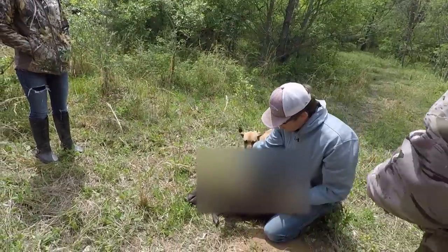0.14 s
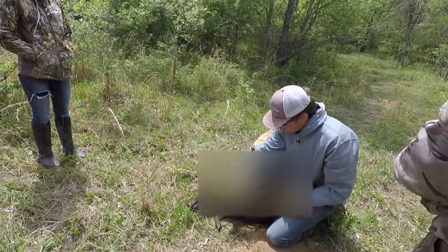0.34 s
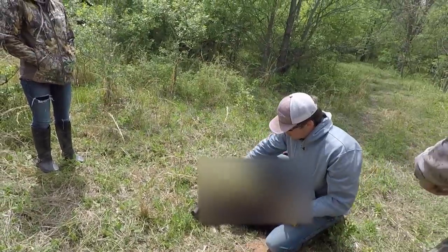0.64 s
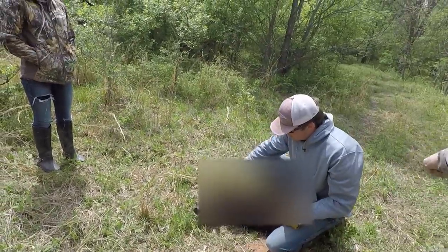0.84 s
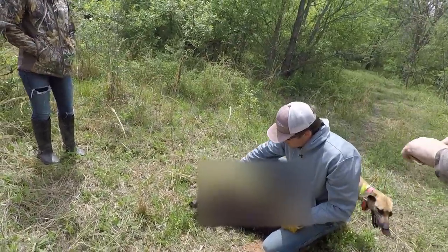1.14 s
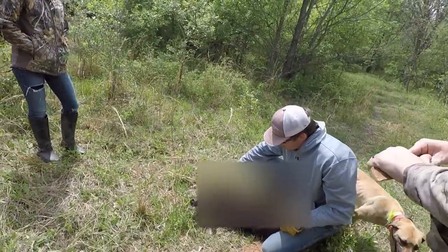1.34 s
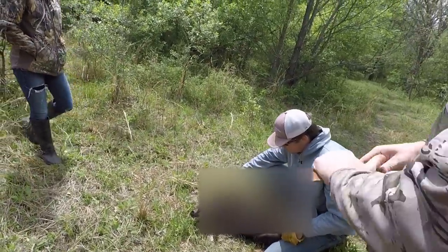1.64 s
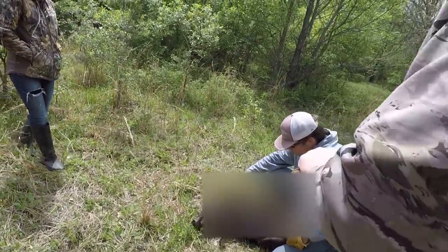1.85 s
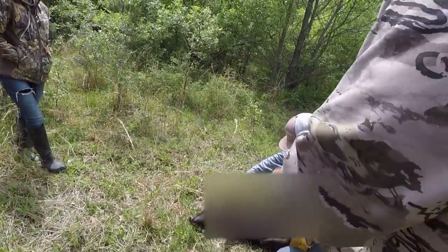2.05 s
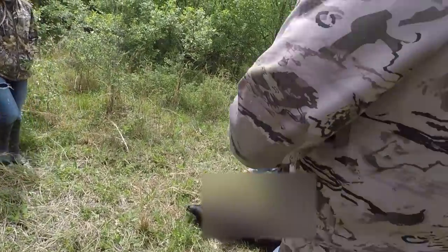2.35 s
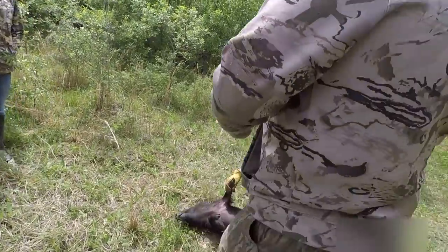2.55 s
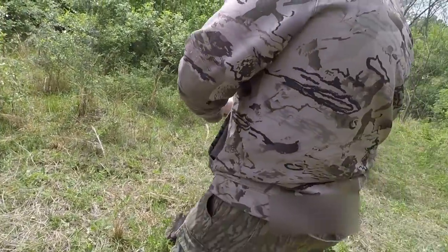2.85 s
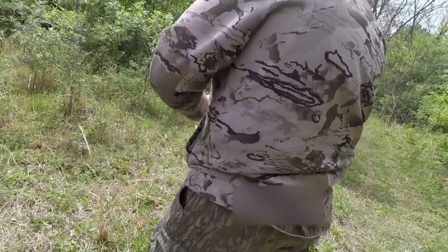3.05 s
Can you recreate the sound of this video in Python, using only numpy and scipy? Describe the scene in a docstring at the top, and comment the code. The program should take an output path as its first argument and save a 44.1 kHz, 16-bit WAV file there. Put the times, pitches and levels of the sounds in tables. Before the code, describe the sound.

Long piercing pig squeal, rough and nearly steady, stops abruptly; later a pulsing growl breaks into a short hoarse shriek and raspy breath, then a brief growl. Outdoor microphone nearby, with dull handling bumps and cloth rustle.

```python
"""Wild pig squealing in the grass

A wild pig pinned in the grass gives one long shrill squeal, then a short hoarse one, with growls around them.
Squeal: the vocal folds chop a high throat whistle into sidebands, mixed with turbulence puffs.
Growl: single fold slaps ring the chest and crack through the mouth; a fluttering noise rasp follows.
Ground, brush and trees return a faint noise tail. Filtered noise makes the jacket's rustle and snaps.
Damped low tones and noise taps make the pig's low opening grunt, then dull bumps by the microphone.
Low lumpy noise is the outdoor rumble, swelling with the pig's growl to carry its continuous low part."""
import sys
import numpy as np
from scipy import signal
from scipy.fft import rfft, irfft
from scipy.io import wavfile
from scipy.ndimage import uniform_filter1d

SR = 44100
rng = np.random.default_rng(int(sys.argv[2]) if len(sys.argv) > 2 else 0)


def master_out(mix):
    """Clip the mix to full scale and print it as 16-bit PCM to the path in sys.argv[1]."""
    frames = np.transpose(np.atleast_2d(mix))
    ceiling = np.clip(frames, -1, 1)
    pcm = np.round(ceiling * 32767).astype(np.int16)
    wavfile.write(sys.argv[1], SR, pcm)


N = 141120


def amp(db):
    """Decibels to gain."""
    return 10 ** (np.asarray(db) / 20)


def unit(x):
    """Scale to rms 1."""
    return x / np.sqrt(np.mean(x ** 2) + 1e-20)


def along(table, t_s, axis=1):
    """Column of a time curve, linear in t."""
    rows = np.array(table, float)
    return np.interp(t_s, rows[:, 0], rows[:, axis])


def across(table, hz, axis=1):
    """Column of a spectrum, linear in log f."""
    rows = np.array(table, float)
    return np.interp(np.log(hz + 1), np.log(rows[:, 0]), rows[:, axis])


def colour(x, spectrum):
    """Zero-phase filter by a spectrum, to rms 1."""
    hz = np.fft.rfftfreq(len(x), 1 / SR)
    return unit(irfft(rfft(x) * amp(across(spectrum, hz)), len(x)))


def noise():
    """White noise for the whole scene."""
    return rng.standard_normal(N)


def wander(size, hz):
    """Low-passed random drift, rms 1 over the whole scene."""
    f = np.fft.rfftfreq(N, 1 / SR)
    return unit(irfft(rfft(noise()) / (1 + (f / hz) ** 2), N))[:size]


def add(mix, s, sound):
    """Mix a sound in at s seconds."""
    part = mix[max(round(s * SR), 0):][:len(sound)]
    part += sound[:len(part)]


def burst(spectrum, decay_s, ring_s=.01, ring_db=-60):
    """Decaying noise push plus weaker ring through a minimum-phase body filter."""
    t = np.arange(4096) / SR
    envelope = np.exp(-t / decay_s) + amp(ring_db) * np.exp(-t / ring_s)
    push = rng.standard_normal(len(t)) * envelope
    log_gain = np.log(amp(across(spectrum, abs(np.fft.fftfreq(len(t), 1 / SR)))))
    body = np.exp(np.conj(signal.hilbert(log_gain)))
    out = np.fft.ifft(np.fft.fft(push) * body).real
    return unit(out) * np.sqrt(2 * decay_s / t[-1])


def spread(source, side_db):
    """Two draws of a source as middle and side."""
    return source() + amp(side_db) * np.array([[1], [-1]]) * source()


# low rumble spectrum, outdoors and growl [f/Hz, gain/dB]
RUMBLE_SPECTRUM = [(25,-16),(60,-58),(105,-31),(155,4),(300,-4),(600,-13),(2000,-13.5),(6500,-26.5),(9000,-66)]
# low rumble level, swelling with the pig's growl [t/s, level/dB]
RUMBLE_LEVEL = [(0,-48),(.6,-48.5),(1.7,-58),(1.98,-54),(2.1,-33.5),(2.55,-49),(2.96,-42),(3.2,-57.5)]


def rumble():
    """Low lumpy rumble: outdoor noise with slow random level drift, swelling with the pig's growl."""
    level_db = along(RUMBLE_LEVEL, np.arange(N) / SR) + 5.54 * wander(N, 2.7)
    return colour(noise(), RUMBLE_SPECTRUM) * amp(level_db)


# jacket rubbing level [t/s, level/dB]
CLOTH_LEVEL = [(0,-52),(1.95,-63.5),(2.1,-50.5),(2.55,-53.5),(2.715,-49),(2.745,-45.5),(3.2,-46)]
# cloth spectrum [f/Hz, gain/dB]
CLOTH_SPECTRUM = [(100,-53),(170,-1),(1000,-3.5),(3200,-16),(5000,-6.5),(7000,-3.5),(8300,-12.5),(15000,-24.5)]
# cloth snaps [t/s, level/dB]
SNAPS = [(2.735,-36.5),(3.105,-41)]
SNAP_DECAY_S, CLOTH_GRAIN_DB, CLOTH_GRAIN_HZ = 0.0053, 2.5, 300


def jacket():
    """Cloth rub: noise with random fast grain, plus short snaps."""
    grain = amp(CLOTH_GRAIN_DB * wander(N, CLOTH_GRAIN_HZ))
    rub = colour(noise() * grain, CLOTH_SPECTRUM)
    out = amp(along(CLOTH_LEVEL, np.arange(N) / SR)) * rub
    for s, db in SNAPS:
        add(out, s, amp(db) * burst(CLOTH_SPECTRUM, SNAP_DECAY_S))
    return out


# the pig's low opening grunt (first row), then bumps by the microphone [t/s, thump level/dB, tap level/dB]
GRUNT_AND_BUMPS = [(.038,-29.5,-37),(0.7903,-30.5,-36),(0.893,-35,-49),(1.783,-42,-39.5),(1.941,-42,-40.5),(2.622,-37.5,-49),(2.6453,-33.5,-35.5)]
# thump partials [f/Hz, level/dB]
THUMP_PARTIALS = [(175,3.9),(265,0)]
# tap spectrum [f/Hz, gain/dB]
TAP_SPECTRUM = [(150,-19.5),(500,1),(900,3),(1500,1.5),(2000,-19),(4000,-18),(15000,-50)]
THUMP_PEAK_S, TAP_DECAY_S = 0.0028, 0.0018


def grunt_and_bumps():
    """Low opening grunt, then dull bumps by the microphone: damped low partials plus a noise tap."""
    out, t = np.zeros(N), np.arange(SR // 10) / SR
    tones = sum(amp(db) * np.sin(2 * np.pi * hz * t) for hz, db in THUMP_PARTIALS)
    thump = tones * (t / THUMP_PEAK_S) * np.exp(1 - t / THUMP_PEAK_S)
    thump = signal.sosfilt(signal.butter(6, 135, "high", fs=SR, output="sos"), thump)
    for s, thump_db, tap_db in GRUNT_AND_BUMPS:
        add(out, s, amp(thump_db) * thump)
        add(out, s, amp(tap_db) * burst(TAP_SPECTRUM, TAP_DECAY_S))
    return out


GROUND_DB, GROUND_DECAY_S = -17, 0.0031
BRUSH_DB, BRUSH_T60_S = -15, 0.34
TREES_DB, TREES_DELAY_S, TREES_SPREAD_S = -34, 0.115, 0.012


def brush(x):
    """Scatter from ground, undergrowth and trees: noise taps, independent per ear."""
    t = np.arange(SR // 2) / SR
    ground = np.exp(-t / GROUND_DECAY_S)
    undergrowth = amp(-60 * t / BRUSH_T60_S)
    trees = np.exp(-((t - TREES_DELAY_S) / TREES_SPREAD_S) ** 2)
    shapes = [(GROUND_DB, ground), (BRUSH_DB, undergrowth), (TREES_DB, trees)]
    taps = sum(amp(db) * unit(shape) * rng.standard_normal((2, len(t))) for db, shape in shapes)
    return signal.fftconvolve(x[None], taps / np.sqrt(len(t)), axes=1)[:, :N]


# microphone pair [f/Hz, left lead/rad, left minus right/dB]
PORTS = [(100,0,0),(780,-.1,-4),(1020,-1.3,-6),(1400,-4.7,-1),(1950,-5.1,2),(2200,-3.1,4),(2420,-1.2,0),(2850,.1,-3),(4200,0,0),(5500,-.8,-5),(6100,.3,0),(6950,.2,7),(7450,3.3,0),(8700,5.2,-12)]


def ports(x):
    """Direct sound at two microphone ports: phase and level differ with frequency, power kept."""
    hz = np.fft.rfftfreq(2 * N, 1 / SR)
    lead_rad, tilt = across(PORTS, hz), amp(across(PORTS, hz, axis=2))
    pair = np.array([tilt * np.exp(1j * lead_rad), np.ones(len(hz))]) * np.sqrt(2 / (1 + tilt ** 2))
    return irfft(rfft(x, 2 * N) * pair)[:, :N]


# throat postures, each [f/Hz, gain/dB]
SLACK = [(300,-29),(1000,-7.5),(1400,-28),(1980,0),(2600,-12.5),(3450,0.5),(4150,-11),(4600,0.5),(5000,-5.5),(5750,-1.5),(7000,-19),(8000,-23.5),(15000,-50)]
TIGHT = [(300,-26),(550,-15),(750,-22.5),(1000,-11.5),(1350,-39),(1700,-37.5),(2000,-5.5),(2400,-15.5),(3100,-7.5),(3450,-15.5),(4200,-12),(4520,4.5),(5000,-15),(6700,-16.5),(7600,-22.5),(10500,-45.5),(15000,-52)]
PINCHED = [(300,-31.5),(650,-19),(1050,-16),(1350,-33),(1800,-28.5),(2200,-3),(2500,-9),(2880,-1.5),(3700,-18.5),(4400,-25),(5250,-6.5),(5900,-15.5),(6800,-29),(8100,-26.5),(15000,-54)]
WIDE = [(300,-20),(700,-40.5),(1000,-14),(1350,-26.5),(1650,-20.5),(1900,-4),(2200,-2.5),(2500,-13.5),(2850,-13.5),(3300,-8.5),(4050,-17.5),(4400,-14.5),(4900,-19.5),(5230,-3.5),(5600,-12),(6450,-9),(7600,-16),(8800,-16),(10500,-40.5),(15000,-48.5)]
HOARSE = [(300,-18.5),(1000,-5),(1350,-18),(1800,-5),(2150,4.5),(2600,-3.5),(3000,-10.5),(3300,-20),(3800,-5.5),(4400,8.5),(5200,1.5),(6500,-6.5),(7600,-17.5),(10500,-36.5),(15000,-56)]
# mouth motion [t/s, posture (index into POSTURES), resonance stretch/ratio, odd sideband strength/0-1]
MOUTH = [(.07,0,0.98,.3),(.125,0.2,1.065,0.3),(.17,1.4,0.99,0.25),(.25,1,1.01,0.16),(.54,1.11,1.036,0.5),(.64,2,0.99,0.64),(.74,2.2,0.99,0.3),(.82,3.5,1.042,1),(1.52,3,1,0.76),(1.548,3.5,1.064,0.24),(1.59,4.5,0.74,0.2),(2.2,5,0.93,0.45),(2.33,5,0.98,0.39),(2.365,3.5,0.82,0.31)]
POSTURES = [SLACK, TIGHT, PINCHED, WIDE, SLACK, HOARSE]


def throat(x, start_s):
    """Time-varying vocal tract: blended postures, resonances stretched as the mouth moves."""
    hz, t, z = signal.stft(x, SR, nperseg=512, noverlap=384)
    posture = np.clip(along(MOUTH, t + start_s), 0, 5)
    tract_hz = hz[:, None] / along(MOUTH, t + start_s, axis=2)
    gain_db = 0
    for k, shape in enumerate(POSTURES):
        weight = np.maximum(1 - abs(posture - k), 0)
        gain_db = gain_db + weight * across(shape, tract_hz)
    return signal.istft(z * amp(gain_db), SR, nperseg=512, noverlap=384)[1][:len(x)]


# whistle harmonics 1, 2, ... [level/dB]
WHISTLE_DB = [4.5, 0, -1, 0.5, -19, 5.5]
# breath turbulence spectrum [f/Hz, gain/dB]
TURBULENCE = [(200,-21.5),(1500,4.5),(2200,-0.5),(3200,3),(5000,1),(9000,5),(15000,4)]
SIDEBAND_DB, SIDEBAND_FALL_DB_PER_ORDER, SIDEBAND_SMEAR_RAD, FOLDS_DB = -4, -1, 0.93, -7.5
# rms frequency deviations as ratios; both jitters are at roughness 1
FOLD_JITTER, WHISTLE_JITTER, JITTER_HZ, WAVER, WAVER_HZ = .045, .022, 260, .0047, 30
SHIMMER_DB, SHIMMER_HZ, PUFF_DEPTH = 0.6, 127, 0.4
FULL_CHOP_ROUGHNESS = 0.29  # folds chop the whistle fully from here up


def squeal(curve):
    """Jittery whistle chopped by the folds, plus turbulence puffs, through the throat."""
    t = np.arange(curve[0][0], curve[-1][0], 1 / SR)
    n = len(t)
    odd = along(MOUTH, t, axis=3)
    rough = np.clip(along(curve, t, axis=4), 0, 1)

    fold_hz = along(curve, t) * (1 + FOLD_JITTER * rough * wander(n, JITTER_HZ))
    fold = 2 * np.pi * np.cumsum(fold_hz) / SR
    drift = WHISTLE_JITTER * rough * wander(n, JITTER_HZ) + WAVER * wander(n, WAVER_HZ)
    whistle = 2 * np.pi * np.cumsum(along(curve, t, axis=2) * (1 + drift)) / SR

    sidebands = 0
    for m in (-3, -2, -1, 1, 2, 3):
        gain = amp(SIDEBAND_DB + SIDEBAND_FALL_DB_PER_ORDER * (abs(m) - 1)) * odd ** (m % 2)
        sidebands = sidebands + gain * np.exp(1j * (m * fold + SIDEBAND_SMEAR_RAD * m * m))
    chop = 1 + np.sqrt(np.minimum(rough / FULL_CHOP_ROUGHNESS, 1)) * sidebands
    harmonics = sum(amp(db) * np.exp(1j * (k + 1) * whistle) for k, db in enumerate(WHISTLE_DB))
    tone = (chop * harmonics).real
    tone += amp(FOLDS_DB) * sum(odd ** (m % 2) * np.cos(m * fold) for m in range(1, 5))

    puffs = colour(noise()[:n] * (1 + PUFF_DEPTH * np.cos(fold)), TURBULENCE)
    voice = np.sqrt(1 - rough) * unit(throat(tone, t[0])) + np.sqrt(rough) * unit(throat(puffs, t[0]))
    voice /= np.sqrt(uniform_filter1d(voice ** 2, size=900) + 1e-9)  # level over 20 ms
    effort_db = along(curve, t, axis=3) + SHIMMER_DB * wander(n, SHIMMER_HZ)
    return t[0], voice * amp(effort_db)


# rasping hiss level [t/s, level/dB]
RASP_LEVEL = [(2.21,-67),(2.37,-32.5),(2.49,-42),(2.54,-54),(2.96,-57.5),(3.01,-38.5),(3.1,-39.5),(3.2,-71)]
# rasp spectrum [f/Hz, gain/dB]
RASP_SPECTRUM = [(200,-26.5),(1400,-15),(1800,3.5),(2500,-6),(3200,-1),(3800,1),(4600,-7),(6500,-15),(8000,-28),(15000,-53)]
RASP_RATE_HZ, RASP_FLUTTER = 45, 0.28


def rasp():
    """Breath noise with random level drift and a regular flutter."""
    t = np.arange(N) / SR
    level_db = along(RASP_LEVEL, t) + 2.1 * wander(N, 110)
    flutter = 1 + RASP_FLUTTER * np.cos(2 * np.pi * RASP_RATE_HZ * t)
    return colour(noise(), RASP_SPECTRUM) * amp(level_db) * flutter


# slack-fold slaps [t/s, chest level/dB, crack level/dB]
GROWL = [(.027,-26.5,-26.5),(.047,-24,-26),(0.056,-38,-20.5),(2.0635,-28.5,-30.5),(2.082,-29,-27),(2.1008,-27,-25),(2.1192,-26,-24),(2.138,-26,-24),(2.157,-26,-31),(2.173,-25,-29),(2.1882,-23,-15),(2.201,-24.5,-27),(2.2107,-24,-14.5),(2.834,-34,-40),(2.908,-32,-35),(2.9308,-24.5,-14),(2.949,-20.5,-18),(2.9662,-22,-31),(2.987,-45,-25.5)]
# chest spectrum [f/Hz, gain/dB]
CHEST_SPECTRUM = [(110,-61),(170,1),(300,-4),(600,-3.5),(1080,5),(1400,-10.5),(1700,-15),(2500,-15),(9000,-74)]
# crack spectrum [f/Hz, gain/dB]
CRACK_SPECTRUM = [(200,-39),(1500,-24),(2600,-9),(3150,12),(3550,-4),(4300,6.5),(5300,0.5),(6700,-6.5),(7800,-54),(15000,-104)]
CHEST_DECAY_S, CHEST_RING_S, CHEST_RING_DB = 0.0015, 0.012, -15
CRACK_DECAY_S, CRACK_RING_S, CRACK_RING_DB = 0.0007, 0.011, -22.5
REBOUND_S, REBOUND_DB = .0087, -10  # second crack as the folds part again, re chest level
HOARSE_FROM_S, HOARSE_TO_S = 2, 2.5  # growl into the short squeal shares its throat


def growl(out):
    """Add single fold slaps: a chest burst, a crack and a rebound crack each."""
    for s, chest_db, crack_db in GROWL:
        add(out, s, amp(chest_db) * burst(CHEST_SPECTRUM, CHEST_DECAY_S, CHEST_RING_S, CHEST_RING_DB))
        mouth = HOARSE if HOARSE_FROM_S < s < HOARSE_TO_S else CRACK_SPECTRUM
        for at_s, db in ((s, crack_db), (s + REBOUND_S, chest_db + REBOUND_DB)):
            add(out, at_s, amp(db) * burst(mouth, CRACK_DECAY_S, CRACK_RING_S, CRACK_RING_DB))


# squeals, each [t/s, fold rate f/Hz, whistle f/Hz, effort level/dB, roughness/0-1]
LONG_SQUEAL = [(.062,228.4,1550,-30,0.2),(.075,241.5,1622,-19,0.58),(.125,265.3,1851,-18,0.28),(.2,278.9,1994,-18,0.53),(.36,272.3,1944,-17,0.42),(.5,287.3,2028,-15,0.52),(.68,317.6,2225,-13,0.39),(.79,298,2251,-16.5,0.29),(.97,287.9,2191,-16.5,0.3),(1.25,286.8,2177,-15.5,0.27),(1.51,293.9,2184,-14,0.34),(1.54,274.5,2044,-13.5,0.03),(1.553,269,1760,-22,0.1),(1.568,253.2,1490,-23,0.02),(1.592,215,1060,-51,0.02)]
SHORT_SQUEAL = [(2.21,197,1649,-24,0.27),(2.224,249.9,1700,-14.5,0.66),(2.292,275.1,1822,-17.5,0.54),(2.325,267.8,1822,-15.5,0.33),(2.346,258.4,1530,-15.5,0.22),(2.365,236,1144,-29.5,0.16)]


def pig():
    """The pig's rasp, squeals and growl slaps."""
    out = rasp()
    for curve in (LONG_SQUEAL, SHORT_SQUEAL):
        add(out, *squeal(curve))
    growl(out)
    return out


def scene():
    """Pig direct and scattered, with rumble, jacket, low grunt and bumps."""
    voice = pig()
    low = spread(rumble, side_db=-3.0) + grunt_and_bumps()
    return low + spread(jacket, side_db=1.0) + brush(voice) + ports(voice)


OVERLOAD, CUT_HZ = 0.67, 15300  # soft ceiling (full scale = 1), low-pass


def record(dry):
    """Soft overload on the highest peaks, then band limit."""
    held = dry / (1 + (dry / OVERLOAD) ** 6) ** (1 / 6)
    lowpass = signal.firwin(511, CUT_HZ, window=("kaiser", 9), fs=SR)
    return signal.oaconvolve(held, lowpass[None], "same")


dry = scene()
out = record(dry)
master_out(out)
```